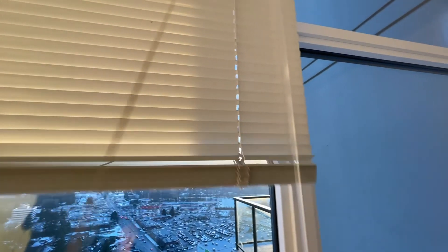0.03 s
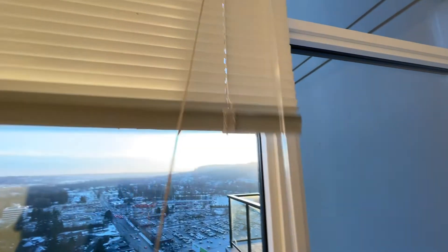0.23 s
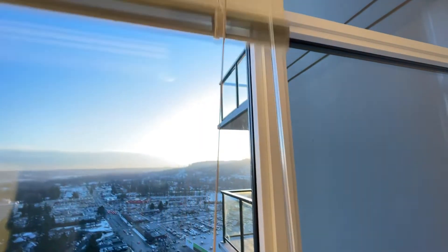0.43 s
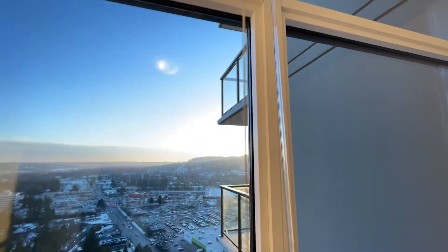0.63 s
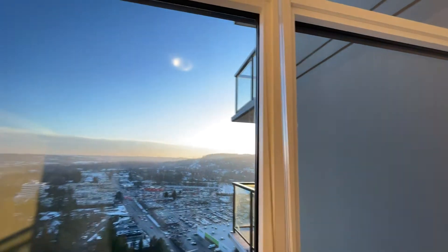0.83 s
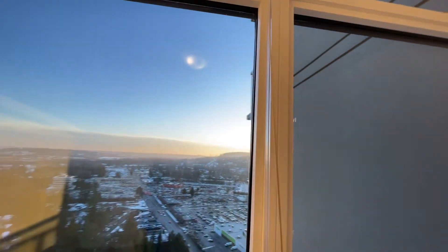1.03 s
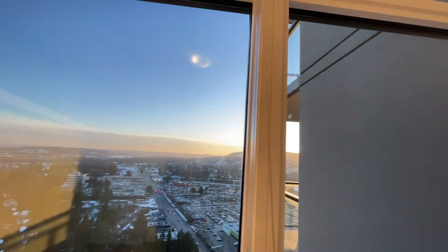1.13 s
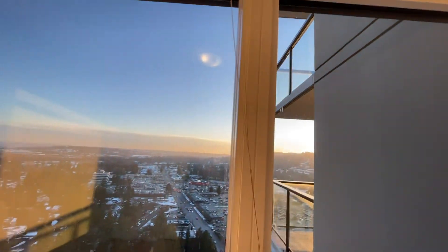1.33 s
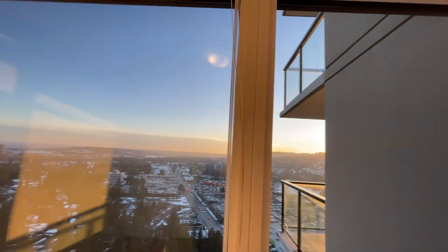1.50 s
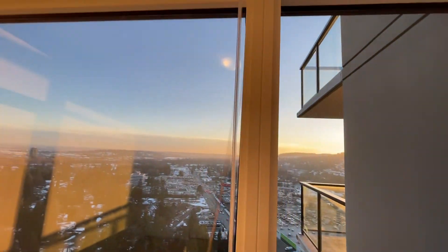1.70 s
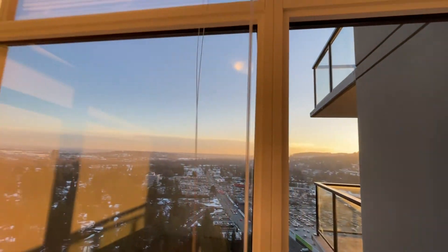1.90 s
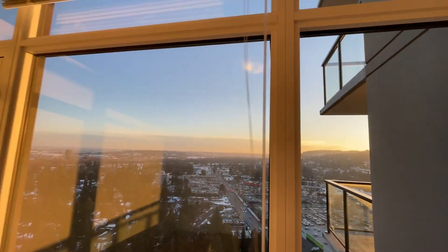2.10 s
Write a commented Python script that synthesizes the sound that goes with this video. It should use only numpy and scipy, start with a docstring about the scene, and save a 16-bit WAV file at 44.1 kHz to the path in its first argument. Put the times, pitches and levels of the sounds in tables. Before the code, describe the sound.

A blind rises quickly with a dry, bright rattle and cord rasp, stops, then the loose cord brushes and its pull clicks against the window frame; close stereo pickup, slightly left, over faint low room rumble.

```python
"""A cord rasps through a metal headrail over a low ventilation rumble, and slats clack as the blind is hauled up.
Soft taps follow, the loose cord swishes, its pull ticks and then knocks on the window frame in a hard room.
Rasp: dense random impulses through resonances. Clacks: decaying modes plus a noise crack, each with one bounce.
Taps and swish: shaped noise. Knock: blurred modes, noise and a low thump. Room: decaying noise as an echo."""
import sys
import numpy as np
from scipy import signal
from scipy.fft import rfft, irfft, next_fast_len
from scipy.io import wavfile
from scipy.ndimage import map_coordinates

SR = 44100
rng = np.random.default_rng(int(sys.argv[2]) if len(sys.argv) > 2 else 0)


def file_out(sig):
    """Save sig as 16-bit WAV at sys.argv[1]."""
    # one column per channel
    cols = np.atleast_2d(sig).T
    # limit, then scale
    lim = np.clip(cols, -1, 1)
    pcm = np.round(lim * 32767).astype(np.int16)
    wavfile.write(sys.argv[1], SR, pcm)


def to_linear_factor(level_db):
    """Convert decibel levels (scalar or array-like) to linear amplitude factors."""
    exponent = np.asarray(level_db, float) / 20
    return 10 ** exponent


N = 94903

# Ventilation spectrum: pitch_hz, relative density_db
AIR_TONE = [(15, -22), (25, -7.5), (74, -2), (145, -8), (229, -8.5), (451, -19.5), (607, -16.5),
            (1260, -17), (3920, -40), (13600, -52), (16000, -48)]
# Likeness of the ventilation at the two ports: pitch_hz, correlation (-1 to 1)
PORT_LIKENESS = [(40, 0), (125, 1), (250, 0.4), (600, 0.0052), (1500, 0), (15000, 0.086)]
AIR_DB, HUM_DB, HUM_HZ = -53.5, -58, 60

# Swells of the low rumble: start_s, level_db
RUMBLE_SWELL = [(.25, -76), (.37, -54), (.45, -65), (.56, -53.5), (.72, -59), (.85, -56), (1.12, -76),
                (1.19, -60), (1.3, -69), (1.39, -54.5), (1.46, -57), (1.52, -70), (1.61, -64),
                (1.645, -53.5), (1.75, -64)]
# Rumble spectrum: pitch_hz, relative density_db
RUMBLE_TONE = [(60, -27), (120, -5.5), (200, 0.5), (330, -4), (450, -10.5), (800, -42.5)]

# Decay of the room tail: pitch_hz, t60_s
ROOM_DECAY = [(200, 0.56), (1500, 0.55), (4000, 0.43), (12000, 0.26)]
ROOM_DB, NEAR_DB, NEAR_T60_S, NEAR_DELAY_S = -2, -9, 0.025, 0.003

# Brushing of the loose cord: start_s, level_db before the random wavering
SWISH_SWELL = [(.9, -59), (1.1, -72), (1.16, -73.5), (1.22, -65.5), (1.33, -66), (1.39, -57.5),
               (1.47, -64.5), (1.52, -71.5), (1.6, -61), (1.65, -48.5)]
# Swish spectrum before the low cut: pitch_hz, relative density_db
SWISH_TONE = [(120, -22), (250, 2), (1100, -2), (3000, -14), (6900, -20), (13300, -29), (16000, -51)]

# Soft taps: start_s, relative level_db, tilt_db_per_octave, t60_s, lowest_hz
TAPS = [(.842, -31.5, -17.5, 0.14, 1350), (1.033, -28.5, -13.5, 0.054, 1400),
        (1.176, -40, -10.5, 0.14, 300), (1.539, -30, 3, 0.046, 1500), (1.855, -53.5, -10, 0.076, 3000)]
TAP_RISE_S = 0.0025

# The blow on the frame and its rebounds: start_s, relative level_db
KNOCKS = [(1.617, -14), (1.644, -28.5), (1.658, -31), (1.681, -34)]
# Modes of the frame: pitch_hz, relative level_db, t60_s
FRAME_MODES = [(492, -2.5, 0.061), (520.5, -2.5, 0.073), (1085, -6, 0.06), (1330, -2, 0.04),
               (1674, -1.5, 0.07), (2187, 4.5, 0.048), (2790, 2.5, 0.1), (3390, 10, 0.023), (3890, 1, 0.06),
               (4430, -2, 0.066), (4840, -11.5, 0.076), (6070, -5, 0.045), (8770, 0.5, 0.14),
               (9200, -20, 0.091), (11700, -3, 0.076)]
# Spectrum of the strike noise: pitch_hz, relative density_db
STRIKE_TONE = [(80, -47), (350, -24), (509, -15), (868, -9), (2210, -1.5), (2480, -7), (7540, -17),
               (12300, -12), (15400, -39), (16500, -50)]
# How far the frame modes wander: pitch_hz, phase_rad per unit of wobble
BLUR_DEPTH = [(500, .1), (2500, 1.1), (9000, 1.2)]
FRAME_DB, BLUR_KNOTS_PER_S = -17.5, 226
STRIKE_DB, STRIKE_T60_S = -3.5, 0.011
SHIVER_DB, SHIVER_T60_S = -21, 0.14  # the glass shivers on after the strike
THUMP_HZ, THUMP_DB, THUMP_RISE_S, THUMP_T60_S = 109.5, -23, 0.02, 0.3  # the pane booms up slowly

# Slat clacks: start_s, relative level_db, low_body_db, treble_db, bottom_rail_db
CLACKS = [(.1322, -5.5, 1.5, -10, -15), (.149, -24, -4.5, 9, -12), (.1665, -25.5, 1, 0, -16.5),
          (.1745, -12.5, -3.5, -5, -38), (.2005, -8, 0.5, -1, -15.5), (.3316, -22.5, -2.5, 4.5, -25.5),
          (.352, -16.5, 2.5, 8, -26), (.3755, -5, -1, 3, -24.5), (.406, -22, 7, -8, -22.5),
          (.431, -14, -8, -1, -15.5), (.478, -15.5, -7, 7.5, -26), (.4925, -16, 9, 6, -6.5),
          (.526, -21, 8.5, -6.5, -16), (.5405, -17, 7, 0.5, -4.5), (.548, -11, -6.5, 5.5, -9),
          (.5535, -12.5, -4.5, 1.5, -11.5), (.566, -18.5, -4.5, 2, -9), (.5765, -19.5, 1, 4.5, -18),
          (.6255, -11, -3.5, 2, -9.5), (.656, -31.5, 4, -14.5, -14), (0.6748, -10.5, -5, 3.5, -14),
          (.705, -27.5, 9.5, -3, 1), (.733, -18.5, 6.5, -8, -7)]
# Modes of one slat: pitch_hz, relative level_db, t60_s
SLAT_MODES = [(778, -15.5, 0.013), (1263, -8, 0.0085), (2730, -10.5, 0.0039), (4305, -12, 0.016),
              (4535, -4, 0.0061), (4962, -0.5, 0.0051), (6455, -5, 0.0071), (8506, -13.5, 0.016),
              (9174, 1.5, 0.0041), (11000, -8.5, 0.005), (14300, -12, 0.01)]
CLACK_DB, CONTACT_S, BOUNCE_S, BOUNCE_DB = -2.5, 0.00048, 0.0026, -9
CRACK_DB, CRACK_T60_S, CRACK_LOW_HZ = -1, 0.0063, 1210
BOTTOM_RAIL_HZ, BOTTOM_RAIL_T60_S, BOTTOM_RAIL_DB = 1530, 0.05, -4
RATTLES_PER_S, RATTLE_DB, RATTLE_SPREAD_DB = 100, -4.5, 2.5  # level over the cord effort

# Cord effort, driving both rasp and rattle: start_s, relative level_db
EFFORT = [(0, -39.5), (.1, -39), (.16, -43), (.25, -34), (.34, -35), (.44, -35.5), (.54, -32.5),
          (.64, -34.5), (.71, -37), (.76, -39), (.81, -71), (.9, -60), (1.0, -84)]
# Headrail resonances: pitch_hz, width_hz, relative level_db
HEADRAIL = [(800, 39, 6.5), (1620, 40, -2.5), (2750, 60, -18.5), (4310, 41, 15), (5050, 50, -19),
            (6070, 80, 13.5), (8720, 120, -1), (14200, 200, -1)]
# Spectrum of the bare rasp: pitch_hz, relative density_db
RASP_TONE = [(120, -38), (200, -16), (459, -1.5), (1520, 3), (1730, 4), (2700, 7), (9460, -1), (10600, -8),
             (14200, 0.5), (15600, -20), (16500, -46)]
RASP_DB, HEADRAIL_DB, SLIPS_PER_S = -5, -9.5, 9000
SLIP_SPREAD_DB = 0  # extra scatter of slip strength; 0 leaves it plainly Gaussian
FAR_END_DB = -3.5  # the second lift cord, at the other end of the headrail

# Left port over right port: pitch_hz, level_db
BALANCE = [(60, 4.5), (110, -3.5), (200, -3), (380, 1), (700, 1.5), (1290, 4.5), (2380, -2), (4400, 5.5),
           (8120, 2.5), (15000, -6.5)]
FULL_LAG_S = 0.0004326  # right behind left, for a source fully on the left
# Tone of the microphones: pitch_hz, level_db
MIC_TONE = [(20, -19.5), (45, 2), (6900, 3.5), (7600, -3), (8300, 5.5), (9700, 2), (10600, -4),
            (11600, 6.5), (14800, 3.5), (16000, -27.5)]
NARROW_HZ, TOP_HZ = 12010, 16500


def unit(x):
    """Scaled to rms 1."""
    return x / np.sqrt(np.mean(x ** 2) + 1e-20)


def along(points, hz):
    """Reads a (pitch, value) curve on a log pitch axis."""
    f, v = np.transpose(points)
    return np.interp(np.log(hz + 1), np.log(f + 1), v)


def level(rows):
    """Gain per sample from (start_s, level_db) rows, silent outside them."""
    s, db = np.transpose(rows)
    return to_linear_factor(np.interp(np.arange(N) / SR, s, db, left=-150, right=-150))


def wobble(rate, n=N):
    """A smooth random curve with rate knots a second."""
    knots = rng.standard_normal(int(n * rate / SR) + 4)
    return map_coordinates(knots, [np.arange(n) * rate / SR])


def filtered(x, response):
    """Shapes x by a complex response of frequency."""
    n = x.shape[-1]
    m = next_fast_len(n + 8192)
    return irfft(rfft(x, m) * response(np.fft.rfftfreq(m, 1 / SR)), m)[..., :n]


def noise_like(tone, n=N):
    """White noise given a spectrum, at rms 1."""
    return unit(filtered(rng.standard_normal(n), tone))


def add(out, s, sound):
    """Mixes a sound in at time s."""
    part = out[max(round(s * SR), 0):][:len(sound)]
    part += sound[:len(part)]


def air():
    """Ventilation: drifting shaped noise, partly shared by both ports, with a wavering mains hum."""
    def spread(hz):
        # splitting power between sum and difference sets the correlation of the ports
        turn = np.arccos(np.clip(along(PORT_LIKENESS, hz), -1, 1)) / 2
        return to_linear_factor(along(AIR_TONE, hz)) * [np.cos(turn), np.sin(turn)]

    mid, side = filtered(rng.standard_normal((2, N)), spread)
    hum_gain = to_linear_factor(HUM_DB + 1.6 * wobble(11))
    hum = hum_gain * np.sin(2 * np.pi * HUM_HZ * np.arange(N) / SR + 0.66 * wobble(15))
    drift_db = 0.9 * wobble(5)
    return to_linear_factor(AIR_DB + drift_db) * unit(np.array([mid + side, mid - side])) + hum


def rumble():
    """A soft low rumble that swells and sinks: low-passed noise, nearly alike on both ports."""
    shared, apart = filtered(rng.standard_normal((2, N)), lambda f: to_linear_factor(along(RUMBLE_TONE, f)))
    pair = shared + 0.31 * np.array([[1], [-1]]) * apart
    return level(RUMBLE_SWELL) * to_linear_factor(2.5 * wobble(25)) * unit(pair)


def room(x):
    """Near scatter off glass and frame plus a tail dying band by band, drawn anew each quarter second."""
    out, step = np.zeros((2, N)), SR // 4
    for i in range(0, N, step):
        hz, frames_s, bands = signal.stft(rng.standard_normal((2, SR * 3 // 4)), SR, nperseg=256)
        decay = to_linear_factor(-60 * frames_s / along(ROOM_DECAY, hz)[:, None])
        tail = signal.istft(bands * decay, SR, nperseg=256)[1]
        t = np.arange(tail.shape[1]) / SR
        near = rng.standard_normal(tail.shape) * to_linear_factor(-60 * t / NEAR_T60_S)
        near = np.roll(near, round(NEAR_DELAY_S * SR), axis=1)
        echo = to_linear_factor(ROOM_DB) * tail / np.linalg.norm(tail[0])
        echo = echo + to_linear_factor(NEAR_DB) * near / np.linalg.norm(near[0])
        late = np.pad(x[i:i + step], (60, 0))  # samples before the first reflection
        wet = signal.fftconvolve(late[None], echo, axes=1)[:, :N - i]
        out[:, i:i + wet.shape[1]] += wet
    return out


def swish():
    """The loose cord brushes along the frame: wavering noise with its lows cut."""
    noise = noise_like(lambda f: to_linear_factor(along(SWISH_TONE, f)) / (1 + (500 / (f + 1)) ** 2))
    return level(SWISH_SWELL) * to_linear_factor(4 + 3.5 * wobble(30.79)) * noise


def taps():
    """Soft contacts of stack and cord pull: each a decaying puff of noise with a short rise."""
    out, t = np.zeros(N), np.arange(SR // 4) / SR
    for s, db, tilt, t60, low_hz in TAPS:
        tone = lambda f: to_linear_factor(tilt * np.log2(f / low_hz + 1)) / (1 + (low_hz / (f + 1)) ** 4)
        puff = noise_like(tone, len(t))
        add(out, s, to_linear_factor(db - 6.5 - 60 * t / t60) * (1 - np.exp(-t / TAP_RISE_S)) * puff)
    return out


def knock():
    """The cord pull strikes the frame: a crack, blurred metal modes, a shiver of the glass and a low thump."""
    out, t = np.zeros(N), np.arange(SR // 2) / SR

    def blurred(hz):
        depth = along(BLUR_DEPTH, hz)
        flutter = to_linear_factor(4.2 * depth * wobble(BLUR_KNOTS_PER_S, len(t)))
        return flutter * np.sin(2 * np.pi * hz * t + depth * wobble(BLUR_KNOTS_PER_S, len(t)))

    strike = to_linear_factor(STRIKE_DB - 60 * t / STRIKE_T60_S)
    shiver = to_linear_factor(SHIVER_DB - 60 * t / SHIVER_T60_S)
    boom = to_linear_factor(THUMP_DB - 60 * t / THUMP_T60_S) * (1 - np.exp(-(t / THUMP_RISE_S) ** 2))
    thump = boom * np.sin(2 * np.pi * THUMP_HZ * t)
    onset = 1 - np.exp(-t / 0.00091)
    for s, db in KNOCKS:
        ring = sum(to_linear_factor(mode_db - 60 * t / t60) * blurred(hz) for hz, mode_db, t60 in FRAME_MODES)
        crack = noise_like(lambda f: to_linear_factor(along(STRIKE_TONE, f)), len(t)) * (strike + shiver)
        add(out, s, onset * to_linear_factor(db) * (to_linear_factor(FRAME_DB) * ring + crack + thump))
    return out


def clack(low_db, treble_db):
    """One slat lands on the stack and bounces once; both contacts crack and ring its modes."""
    t = np.arange(SR // 8) / SR
    hz, db, t60 = np.transpose(SLAT_MODES)[..., None]
    colour = along([(1600, low_db), (3000, 0), (6000, 0), (8000, treble_db)], hz)

    def hit():
        mode_db = db + colour + rng.normal(0, 1.2, hz.shape)
        detune = rng.normal(1, 0.0079, hz.shape)
        ring = (to_linear_factor(mode_db - 60 * t / t60) * np.sin(2 * np.pi * hz * t * detune)).sum(0)
        hiss = filtered(rng.standard_normal(len(t)), lambda f: 1 / (1 + (CRACK_LOW_HZ / (f + 1)) ** 2))
        crack = to_linear_factor(CRACK_DB - 60 * t / CRACK_T60_S) * hiss
        return (ring + crack) * (1 - np.exp(-(t / CONTACT_S) ** 2))

    sound = hit()
    add(sound, BOUNCE_S, to_linear_factor(BOUNCE_DB) * hit())
    return sound


def bottom_rail():
    """The bottom rail rings: one decaying mode with a wandering phase."""
    t = np.arange(SR // 4) / SR
    tone = np.sin(2 * np.pi * BOTTOM_RAIL_HZ * t + 1.3 * wobble(60, len(t)))
    return to_linear_factor(BOTTOM_RAIL_DB - 60 * t / BOTTOM_RAIL_T60_S) * tone * (1 - np.exp(-t / 0.0014))


def slats():
    """Loud clacks, which also ring the bottom rail, and a random rattle that follows the cord effort."""
    out, effort = np.zeros(N), level(EFFORT)
    for s, db, low_db, treble_db, rail_db in CLACKS:
        add(out, s, to_linear_factor(db + CLACK_DB) * clack(low_db, treble_db))
        add(out, s, to_linear_factor(db + rail_db) * bottom_rail())
    for i in np.flatnonzero(rng.random(N) < RATTLES_PER_S / SR * (effort > 1e-6)):
        gain = effort[i] * to_linear_factor(RATTLE_DB + rng.normal(0, RATTLE_SPREAD_DB))
        add(out, i / SR, gain * clack(*rng.normal(0, 3.5, 2)))
    return out


def cord():
    """Dense tiny slips of the cord over the lock, heard as a broad rasp and ringing the headrail."""
    slips = (rng.random(N) < SLIPS_PER_S / SR) * rng.standard_normal(N)
    slips = slips * to_linear_factor(SLIP_SPREAD_DB * rng.standard_normal(N))

    def headrail(f):
        # band-pass resonances of alternating sign
        return sum((-1) ** k * to_linear_factor(db) * 1j * f * width / (hz * hz - f * f + 1j * f * width)
                   for k, (hz, width, db) in enumerate(HEADRAIL))

    broad = unit(filtered(slips, lambda f: to_linear_factor(along(RASP_TONE, f))))
    ringing = to_linear_factor(HEADRAIL_DB) * unit(filtered(slips, headrail))
    return level(EFFORT) * to_linear_factor(RASP_DB + 3.68 * wobble(38.2)) * (broad + ringing)


def at_ports(x, way):
    """Balances the ports by pitch and delays each; way 1 reaches the left first, 0 both at once."""
    side = np.array([[1], [-1]])

    def response(f):
        lag = FULL_LAG_S / 2 * (1 - way * side) / (1 + (600 / (f + 1)) ** 2)  # lag shrinks in the lows
        return to_linear_factor(side * along(BALANCE, f) / 2) * np.exp(-2j * np.pi * f * lag)

    return filtered(x, response)


def scene():
    """The blind reaches the left port first, its far cord both at once; room, air and rumble surround them."""
    blind = cord() + slats() + taps() + swish() + knock()
    far = to_linear_factor(FAR_END_DB) * cord()
    return at_ports(blind + room(blind + far), 0.9106) + at_ports(far, 0) + air() + rumble()


def low_pass(x):
    """Removes everything above the highest recorded frequency."""
    return signal.sosfilt(signal.butter(12, 16610, fs=SR, output="sos"), x)


def record(dry):
    """Narrows the stereo image above NARROW_HZ, applies the microphone tone and cuts the top at TOP_HZ."""
    top_difference = filtered(dry[0] - dry[1], lambda hz: 0.85 / (1 + (NARROW_HZ / (hz + 1)) ** 40))
    narrowed = np.array([dry[0], dry[1] + top_difference])
    mix = filtered(narrowed, lambda hz: to_linear_factor(along(MIC_TONE, hz)) * (hz < TOP_HZ))
    return low_pass(mix)


dry = scene()
out = record(dry)
file_out(out)
```